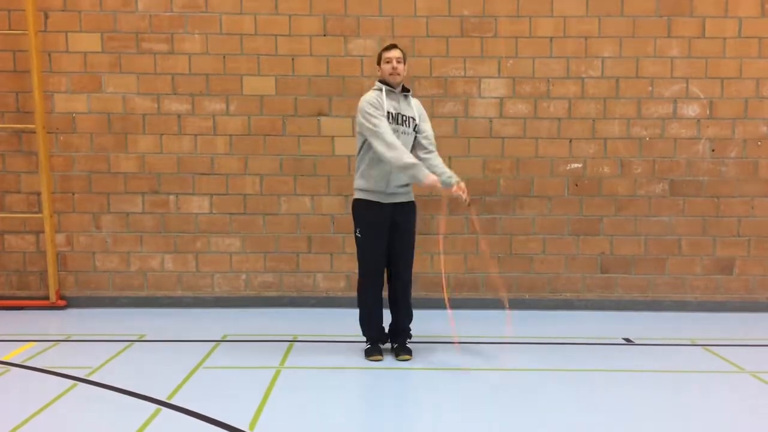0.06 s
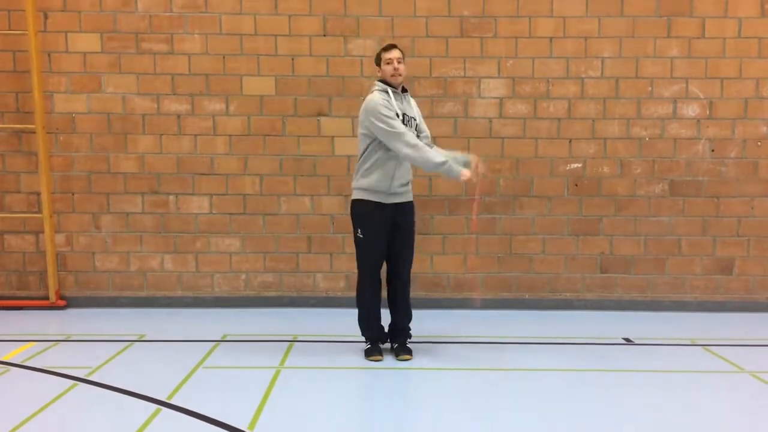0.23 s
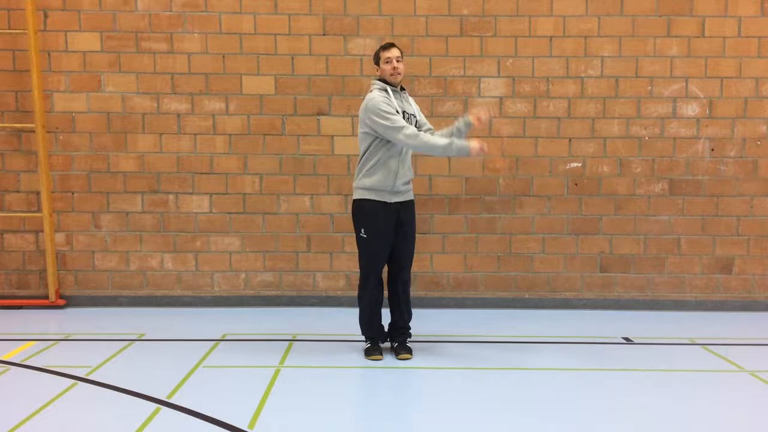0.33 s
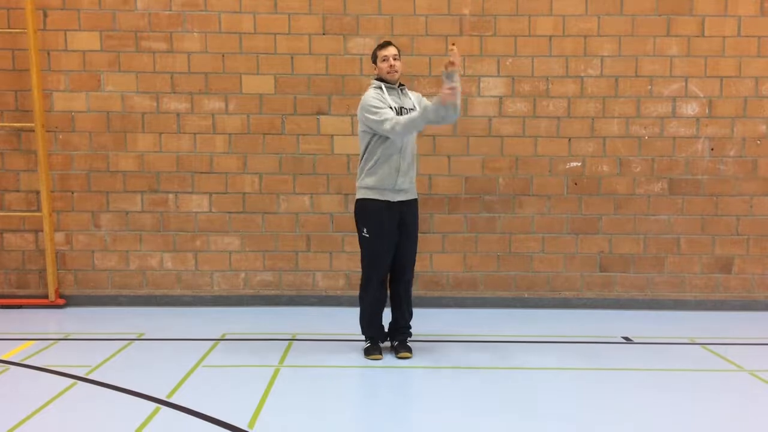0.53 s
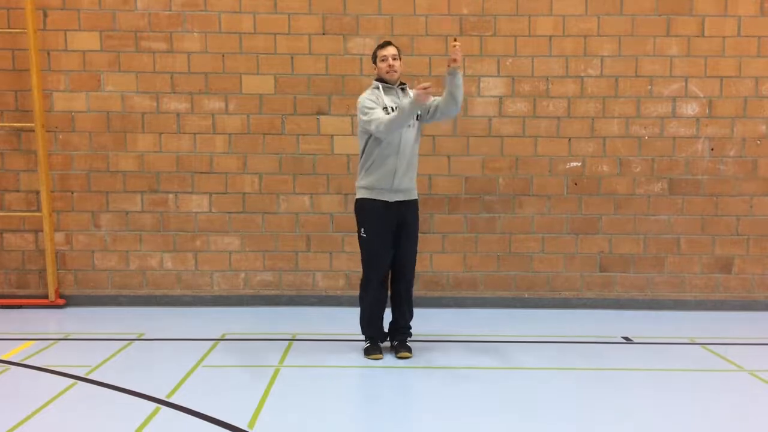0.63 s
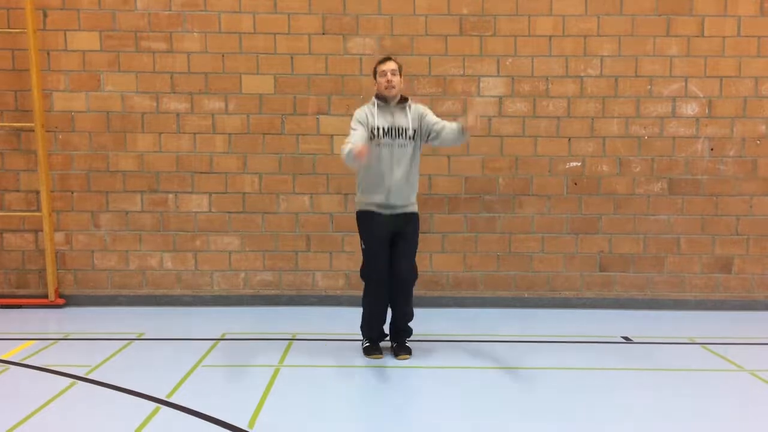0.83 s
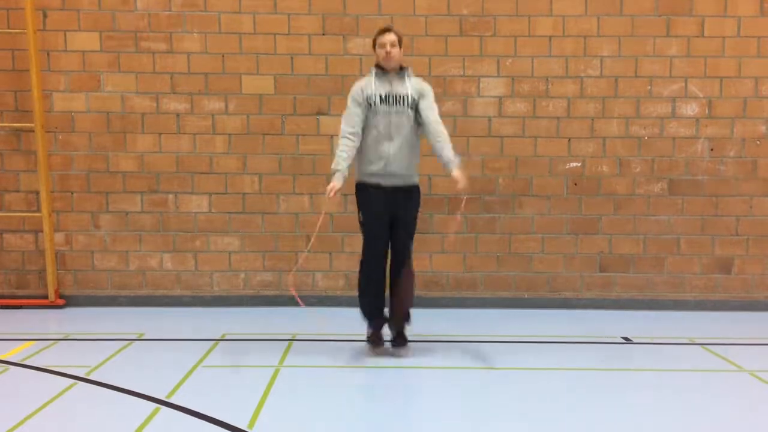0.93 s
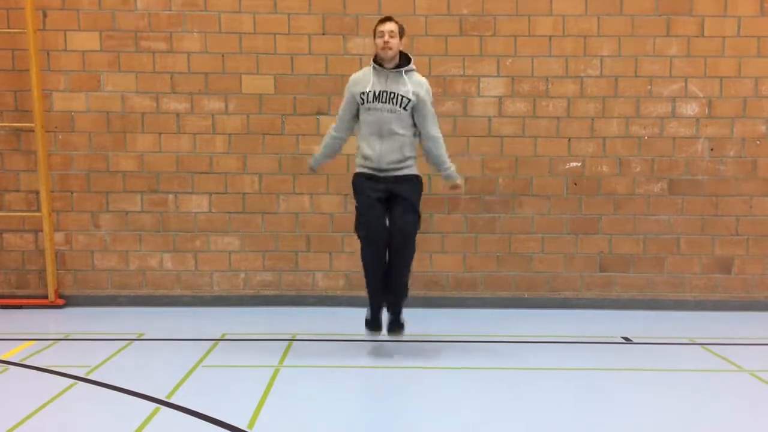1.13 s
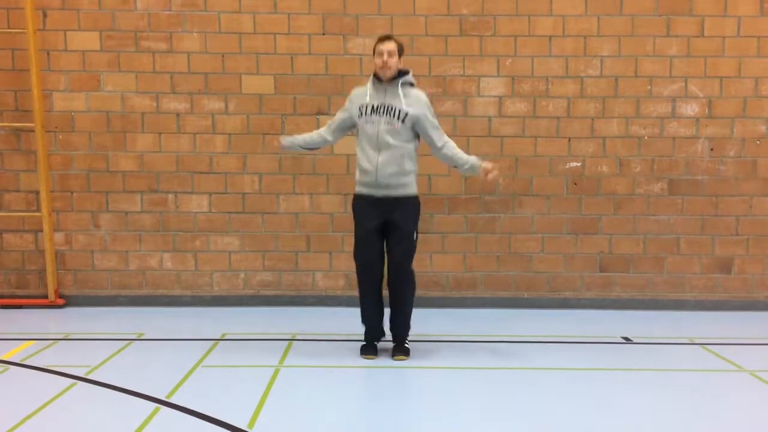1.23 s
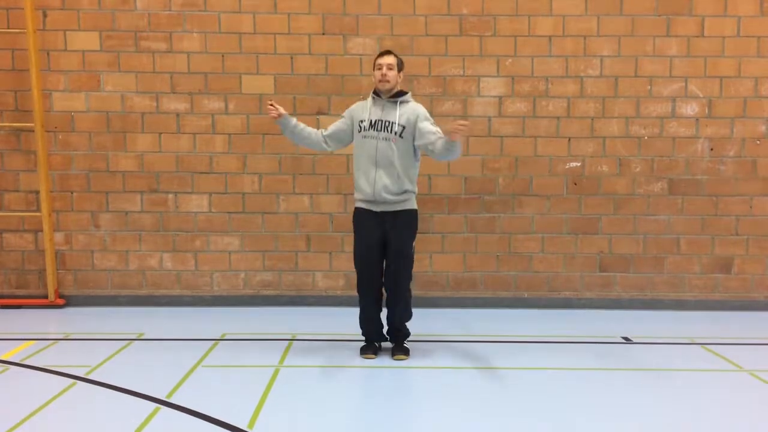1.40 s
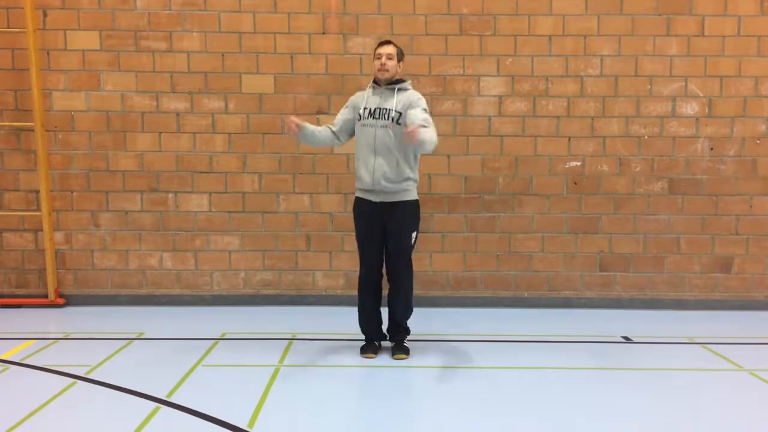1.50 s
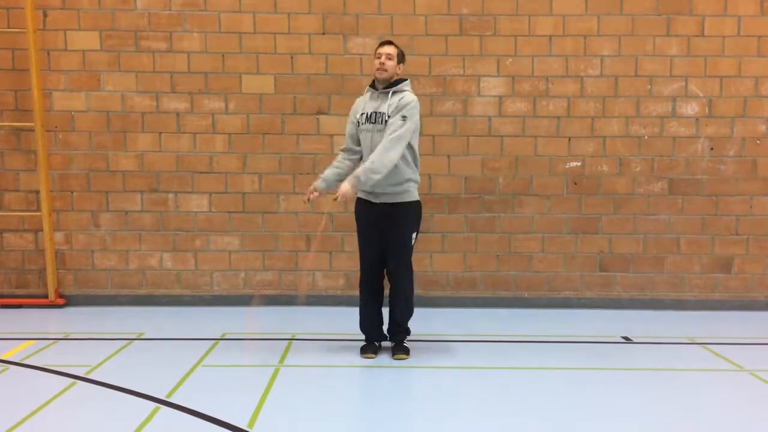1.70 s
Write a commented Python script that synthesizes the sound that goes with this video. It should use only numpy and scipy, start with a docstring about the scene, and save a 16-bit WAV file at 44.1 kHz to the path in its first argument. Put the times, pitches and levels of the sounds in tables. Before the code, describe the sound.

In a large echoing sports hall, a skipping rope slaps the floor a few steps from the microphone. A far thud swells and fades, followed by a second rope slap and the clack of shoes landing, with faint hiss.

```python
"""Skipping rope in a gym

A rope cracks on the floor near a brick wall, which reflects and scatters each impact. Shoes come down
with double clacks that excite damped modes of sole and floor. A heavy thud elsewhere in the hall
arrives as a low pulse and early reflections, then swells and rolls away as reverberation.
A thin ringing hiss comes and goes over the room tone."""
import sys
import numpy as np
from scipy import signal
from scipy.fft import rfft, irfft
from scipy.io import wavfile
from scipy.ndimage import uniform_filter1d

SR = 44100
rng = np.random.default_rng(int(sys.argv[2]) if len(sys.argv) > 2 else 0)


def output_pcm(signal):
    """Save a mono or channel-first signal as 16-bit PCM at the path in sys.argv[1].

    Samples are clipped to [-1, 1] before scaling.
    """
    pcm = np.clip(np.atleast_2d(signal).T, -1, 1) * 32767
    wavfile.write(sys.argv[1], SR, np.round(pcm).astype(np.int16))


N = 77175


def gain_of(db):
    return 10 ** (np.asarray(db) / 20)


def unit_rms(x):
    return x / np.sqrt(np.mean(x ** 2) + 1e-20)


def curve_at(points, hz):
    f, value = np.transpose(points)
    return np.interp(np.log(hz + 1), np.log(f + 1), value)


def add(mix, start, sound):
    part = mix[round(start * SR):][:len(sound)]
    part += sound[:len(part)]


def peaks_db(peaks, f):
    """Bell-shaped spectral peaks, summed in dB."""
    return sum(db / (1 + (2 * (f - hz) / width) ** 2) for hz, width, db in peaks)


def coloured(spectrum_db):
    """Spectral shaping: white noise weighted by a function of frequency, at unit rms."""
    weights = gain_of(spectrum_db(np.fft.rfftfreq(N, 1 / SR)))
    return unit_rms(irfft(rfft(rng.standard_normal(N)) * weights, N))


def swell(start, rise, t60, t):
    """Exponential build-up and decay, silent before the start."""
    age = np.maximum(t - start, 0)
    return (1 - np.exp(-age / np.maximum(rise, 1e-4))) * gain_of(-60 * age / t60)


def room_tone():
    """Steady background noise, raised at first by the decay of an earlier sound in the hall."""
    spectrum = [(21, -24), (35, -1), (142, -5.5), (328, -16), (372, -17), (480, -15.5), (588, -23.5),
                (739, -22.5), (1620, -25.5), (1750, -24.5), (2840, -33), (15200, -52)]  # background noise: f/Hz, spectral level/dB
    tone = gain_of(-53.5) * coloured(lambda f: curve_at(spectrum, f))
    excess_db, t60 = 3.5, 0.33
    return tone * (1 + (gain_of(excess_db) - 1) * gain_of(-60 * np.arange(N) / SR / t60))


def whistle(width_hz=114):
    """Quadrature modulation: slow noise on a drifting carrier makes a faint, fuzzy whistle."""
    track = [(0, -75, 4590), (.2, -89, 4550), (.42, -90, 4500), (.7, -85, 4553), (.9, -69, 4570),
             (1.101, -74, 4566), (1.239, -83, 4600), (1.265, -63, 4615), (1.33, -60, 4590),
             (1.401, -60, 4560), (1.48, -60.5, 4535), (1.55, -68.5, 4525), (1.75, -75, 4510)]  # course of the whistle: t/s, level/dB, f/Hz
    times, db, hz = np.transpose(track)
    t = np.arange(N) / SR
    fuzz = [coloured(lambda f: -20 * np.log10(1 + (2 * f / width_hz) ** 2)) for _ in range(2)]
    phase = 2 * np.pi * np.cumsum(np.interp(t, times, hz)) / SR
    return gain_of(np.interp(t, times, db)) * (fuzz[0] * np.cos(phase) + fuzz[1] * np.sin(phase))


def impacts(strikes, modes, q, low_cut_hz):
    """Impact excitation: a sharp negative pressure tick plus the damped modes of the struck body."""
    out, t = np.zeros(N), np.arange(2500) / SR
    body = sum(gain_of(db) * np.exp(-np.pi * 1.77 * t / decay) * np.sin(2 * np.pi * hz * t)
               for hz, db, decay in modes)
    for start, tick_db, body_db, hz in strikes:
        w = 2 * SR * np.tan(np.pi * hz / SR)  # prewarped resonance
        denominator = np.polymul([1, w / q, w * w], [1, 2 * np.pi * low_cut_hz])
        tick = signal.lfilter(*signal.bilinear([w * w, 0], denominator, SR), t == 0)
        tick = signal.lfilter(*signal.butter(2, min(1.7 * hz, 20000), fs=SR), tick)
        add(out, start, gain_of(body_db) * body - gain_of(tick_db) * tick / abs(tick).max())
    return out


def rope():
    """Reflection and scattering: cracks on the floor return as echoes and a bright, grainy tail."""
    cracks = [(.2397, -18.5, -35.5, 11200), (.2455, -37, -60, 12000), (.2527, -28, -45, 9700),
              (.274, -46, -45, 8000), (1.0945, -39, -47, 5600), (1.1422, -24, -32.5, 8100),
              (1.1465, -34, -75, 8000), (1.154, -23, -37.5, 10300)]  # cracks and wall echoes: t/s, tick level/dB, ring level/dB, tick f/Hz
    floor_modes = [(877, -3.5, 0.0096), (1750, -32, .006)]  # floor under the rope: f/Hz, level/dB, time to fall 48 dB/s
    scatter = [(0.238, -53.5, 0.11), (0.252, -52.5, 0.24), (.285, -58, 0.27), (.333, -61.5, 0.27),
               (1.1425, -50.5, 0.11), (1.153, -51.5, 0.24), (1.185, -55, .2), (1.238, -58.5, 0.3)]  # from each crack, near wall, sides and far wall: t/s, level/dB, T60/s
    spectrum = [(880, -32), (1500, -2.5), (2040, -1.5), (3310, -8.5), (4290, -5.5), (15000, -7.5)]  # scattered sound: f/Hz, spectral level/dB
    t, rise_s = np.arange(N) / SR, 0.00081
    grain = gain_of(2.7 * unit_rms(uniform_filter1d(rng.standard_normal(N), size=40)))
    power = sum((gain_of(db) * swell(start, rise_s, t60, t)) ** 2 for start, db, t60 in scatter)
    tail = np.sqrt(power) * grain * coloured(lambda f: curve_at([(300, -35)] + spectrum, f))
    return impacts(cracks, floor_modes, q=2.33, low_cut_hz=690) + tail


def low_thumps():
    """Early arrivals: short low thumps, mostly the far thud's first pulse and its hall reflections."""
    pulses = [(0.4264, -30, 260, 1.2), (.448, -25.5, 179, 1.67), (.499, -30, 132, 1),
              (.488, -29, 49.3, 1.7), (.519, -30, 150, 2.8), (.722, -33.5, 150, 3), (.743, -33.5, 150, 3.4),
              (1.097, -32.5, 236.5, 1.1), (1.3726, -30.5, 430, 2.5)]  # low pulses: t/s, level/dB, f/Hz, cycles
    out = np.zeros(N)
    for start, db, hz, cycles in pulses:
        turns = np.arange(0, cycles / hz, 1 / SR) * hz
        add(out, start, gain_of(db) * np.sin(np.pi * turns / cycles) * np.sin(2 * np.pi * turns))
    return out


def diffuse_field(start, level_db, spectrum, t60_scale, lag_scale, flicker_db):
    """Reverberation: noise coloured by hall resonances builds and decays at each band's own rate."""
    resonances = [(150, 16, 2.5), (202, 24, 4), (414, 27, 5), (974, 44, 3), (1272, 27, 3.5)]  # hall modes: f/Hz, width/Hz, level/dB
    decay_times = [(60, 2.07), (250, 1.625), (1000, 1.42), (3000, 1.06), (8000, 0.78), (15000, 0.77)]  # hall decay: f/Hz, T60/s before t60_scale
    rise_times = [(100, 0.0069), (1000, 0.018), (3000, 0.03), (6000, 0.054), (15000, 0.034)]  # build-up of a far sound: f/Hz, time constant/s
    lags = [(500, 0.0036), (3000, 0.0099), (6000, .028), (15000, 0.02)]  # late arrival of the treble: f/Hz, delay/s before lag_scale
    ripple_db, ripple_hz = 1.5, 15
    ripple = unit_rms(uniform_filter1d(rng.standard_normal(N // 2 + 1), size=int(ripple_hz * N / SR)))
    noise = coloured(lambda f: curve_at(spectrum, f) + peaks_db(resonances, f) + ripple_db * ripple)
    hz, t, bands = signal.stft(noise, SR, nperseg=512, noverlap=448)
    hz = hz[:, None]
    flicker = uniform_filter1d(rng.standard_normal(bands.shape), size=6, axis=0)
    flicker = unit_rms(uniform_filter1d(flicker, size=16, axis=1))
    onset = start - .004 + lag_scale * curve_at(lags, hz)
    envelope = swell(onset, curve_at(rise_times, hz), t60_scale * curve_at(decay_times, hz), t)
    bands = bands * envelope * gain_of(flicker_db * flicker)
    gate = np.clip((np.arange(N) / SR - start) / 0.002, 0, 1)
    return gain_of(level_db) * gate * signal.istft(bands, SR, nperseg=512, noverlap=448)[1][:N]


def far_thud():
    """The reverberant field of a distant heavy impact swells and rolls away."""
    spectrum = [(18, -41), (30, -16), (150, -2), (228, -10), (346, -9), (460, -16), (1140, -17.5),
                (1270, -13.5), (1600, -20), (1920, -18), (2310, -25.5), (15000, -52.5)]  # the thud: f/Hz, spectral level/dB
    return diffuse_field(0.4284, -30, spectrum, t60_scale=1, lag_scale=0.78, flicker_db=1.22)


def shoe_clacks():
    """Modal ringing: each contact ticks and sets sole and floor knocking."""
    clacks = [(.434, -48, -60, 7000), (1.3313, -24.5, -27.5, 7850), (1.333, -22, -29, 6000),
              (1.3397, -23.5, -32.5, 5040), (1.3415, -20, -30, 6150), (1.3635, -45, -33.5, 3500),
              (1.4275, -38, -31.5, 2516)]  # shoe contacts: t/s, tick level/dB, knock level/dB, tick f/Hz
    modes = [(209, -10, 0.076), (430, -5.5, 0.04), (590, -2.5, 0.0089), (1103, -7.5, 0.014)]  # sole and floor: f/Hz, level/dB, time to fall 48 dB/s
    return impacts(clacks, modes, q=1.04, low_cut_hz=298)


def hiss():
    """Incoherent addition: overlapping swells of thin hiss sum in power."""
    swells = [(.46, -59, .01, 0.76), (.762, -54, 0.044, 1.34), (1.258, -60, 0.0078, .6),
              (1.311, -49.5, 0.0054, 0.98)]  # swells of hiss: t/s, level/dB, rise/s, T60/s
    spectrum = [(2500, 0), (5000, -3.5), (9000, -8.5), (15000, -14.5)]  # treble slope: f/Hz, spectral level/dB
    peaks = [(13000, 1000, 7)]  # soft high peak: f/Hz, width/Hz, level/dB
    t = np.arange(N) / SR
    noise = coloured(lambda f: curve_at([(800, -4.5)] + spectrum, f) + peaks_db(peaks, f))
    power = sum((gain_of(db) * swell(start, rise, t60, t)) ** 2 for start, db, rise, t60 in swells)
    return np.sqrt(power) * noise


def scuff_and_landing():
    """Reverberation of a scuff and then a landing, shorter than that of the far thud."""
    spectrum = [(18, -62), (30, -41), (65, -6), (281, -5.5), (404, -5), (645, -9.5), (1030, -10),
                (1140, -13), (4310, -21.5), (4650, -20), (15000, -36)]  # shoes on the floor: f/Hz, spectral level/dB
    return sum(diffuse_field(start, db, spectrum, t60_scale=0.76, lag_scale=0, flicker_db=0.3)
               for start, db in [(1.274, -44.5), (1.312, -37)])


def scene():
    """Linear superposition of all sources in one channel."""
    hall = far_thud() + scuff_and_landing() + room_tone()
    return (hall + rope() + low_thumps() + shoe_clacks() + hiss() + whistle())[None]


def record(dry):
    """Band limiting: a bass cut, a shelf that lowers the top treble, then a steep low-pass."""
    def low_pass(x, hz):
        return signal.oaconvolve(x, signal.firwin(511, hz, window=("kaiser", 9), fs=SR)[None], "same")

    bass_cut_hz, shelf_hz, shelf_gain, edge_hz = 51, 15250, gain_of(-30), 16400
    dry = signal.sosfilt(signal.butter(2, bass_cut_hz, 'high', fs=SR, output='sos'), dry)
    shelved = low_pass(dry, shelf_hz) * (1 - shelf_gain) + shelf_gain * dry
    return low_pass(shelved, edge_hz)


dry = scene()
out = record(dry)
output_pcm(out)
```